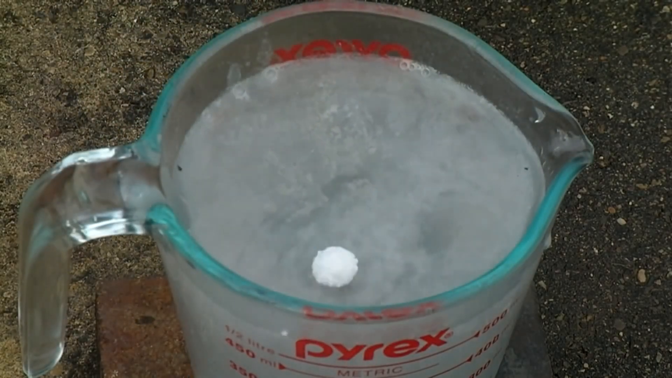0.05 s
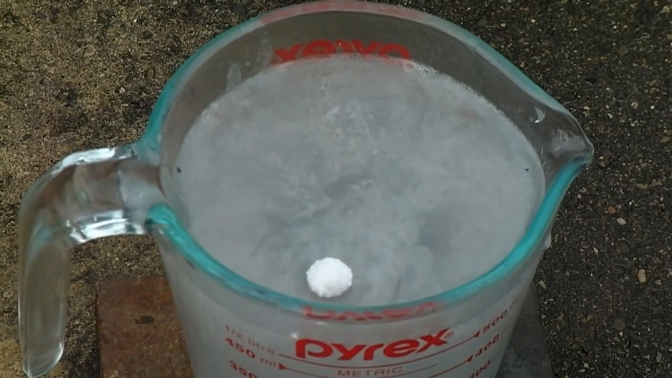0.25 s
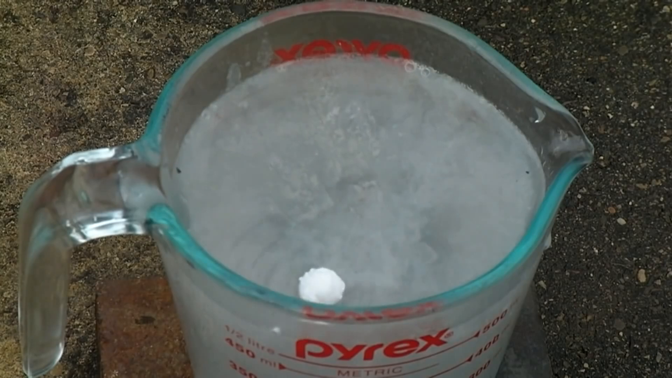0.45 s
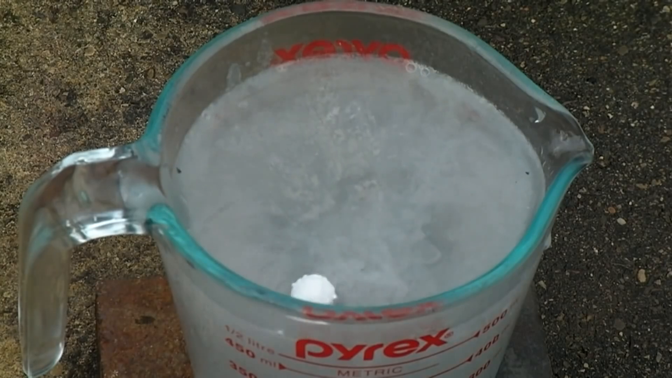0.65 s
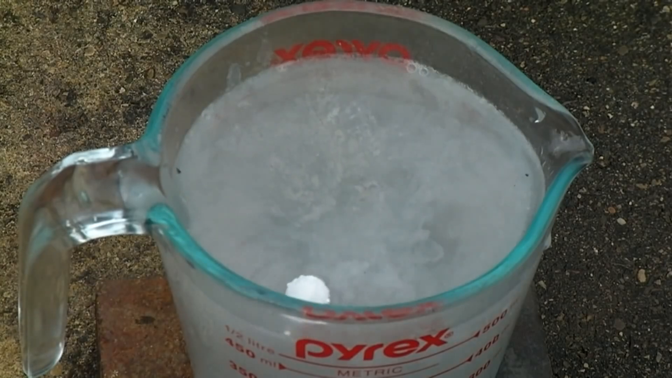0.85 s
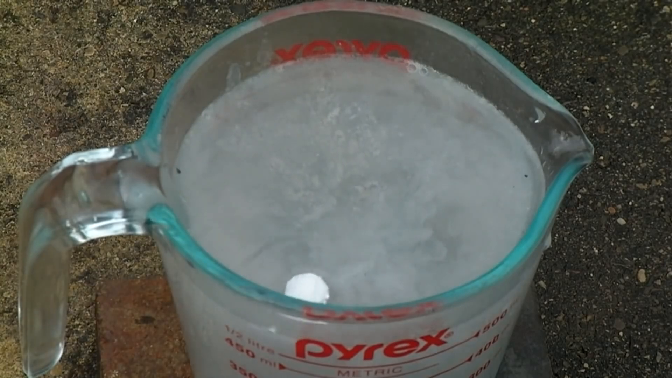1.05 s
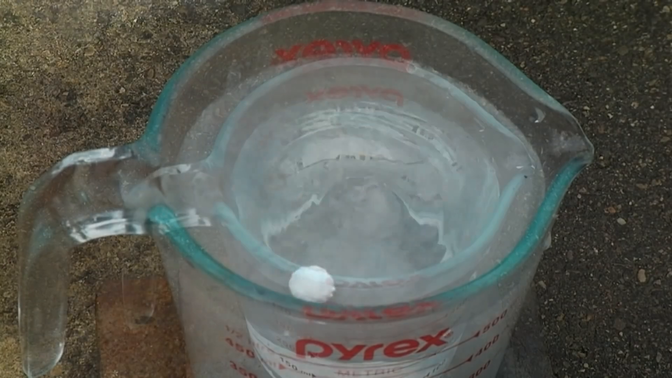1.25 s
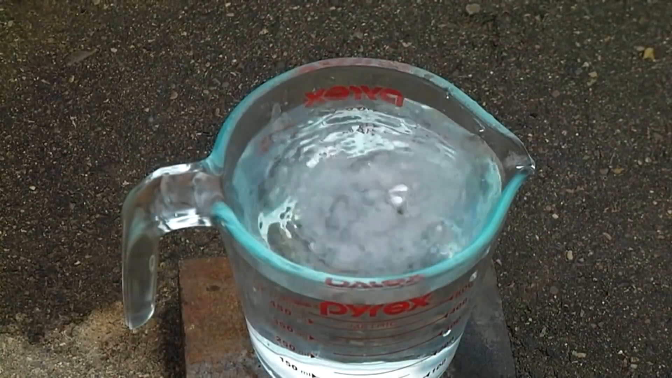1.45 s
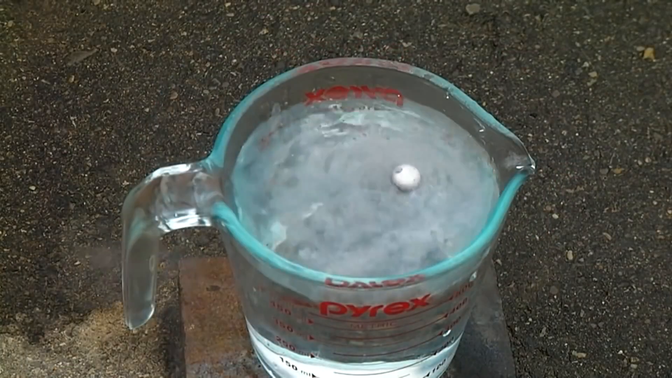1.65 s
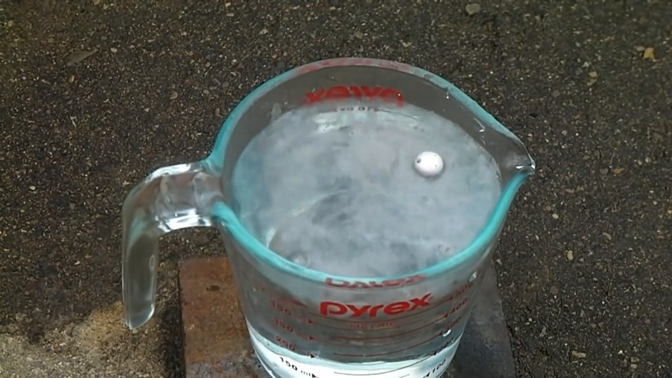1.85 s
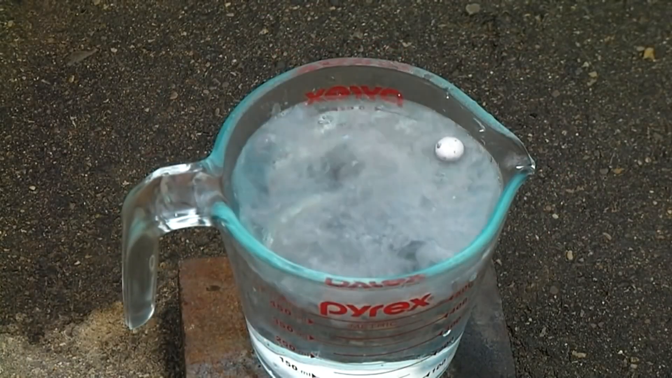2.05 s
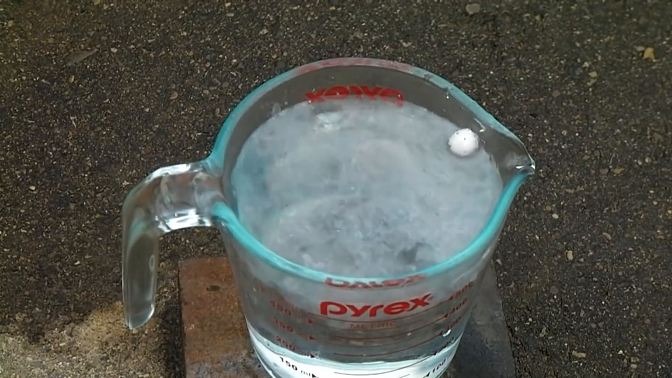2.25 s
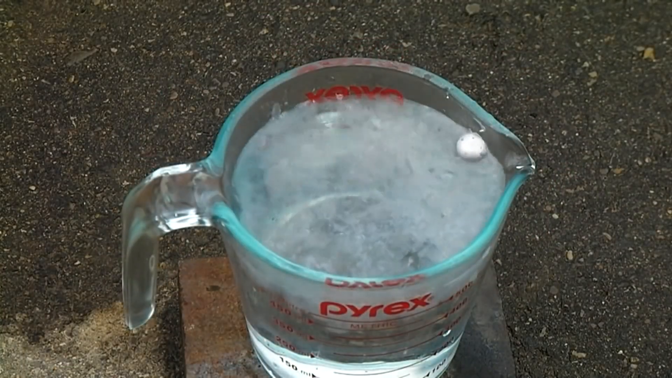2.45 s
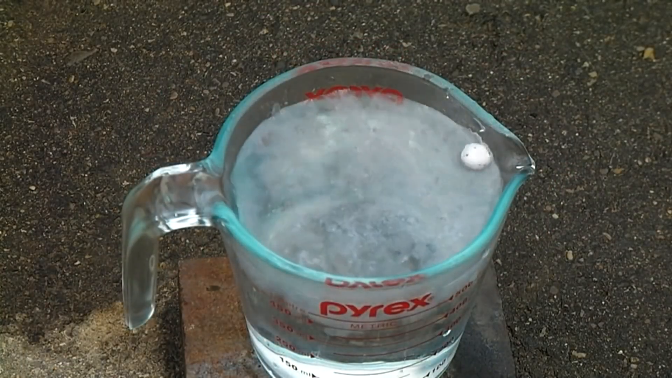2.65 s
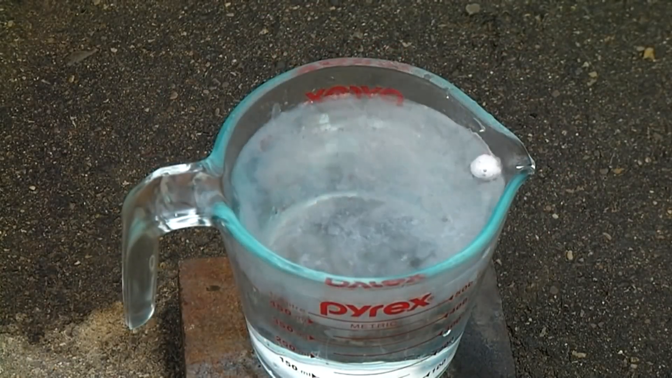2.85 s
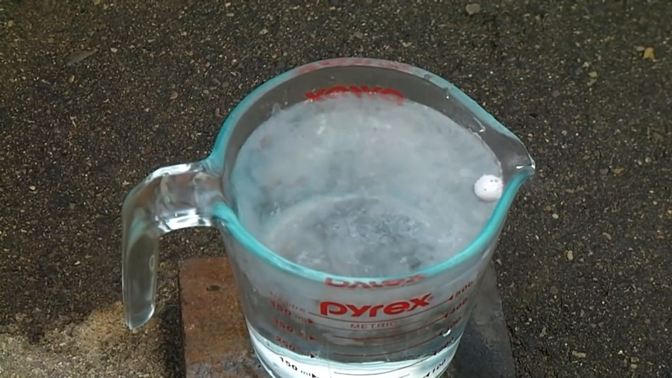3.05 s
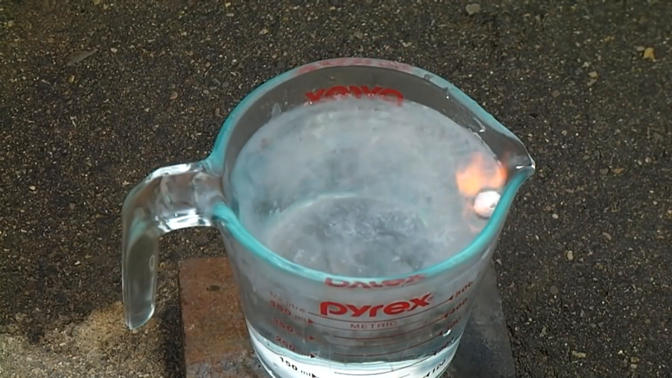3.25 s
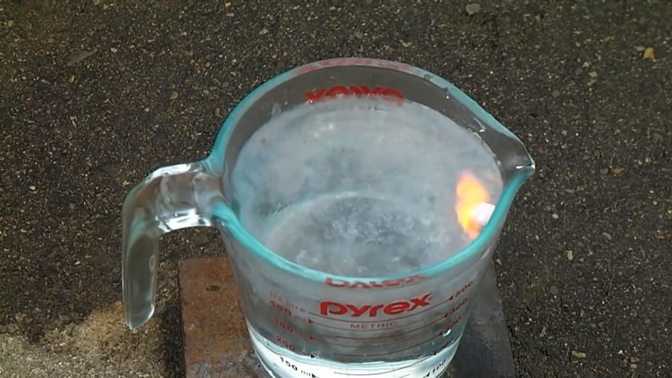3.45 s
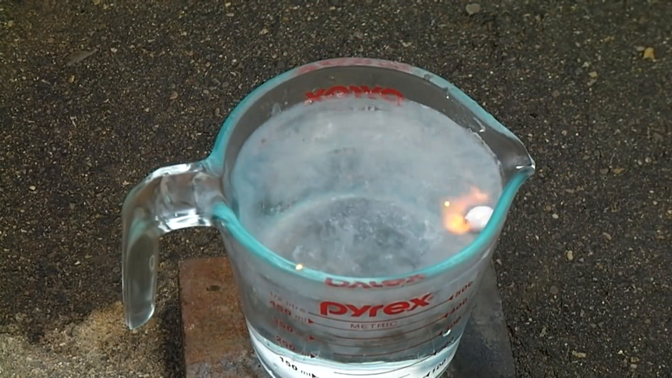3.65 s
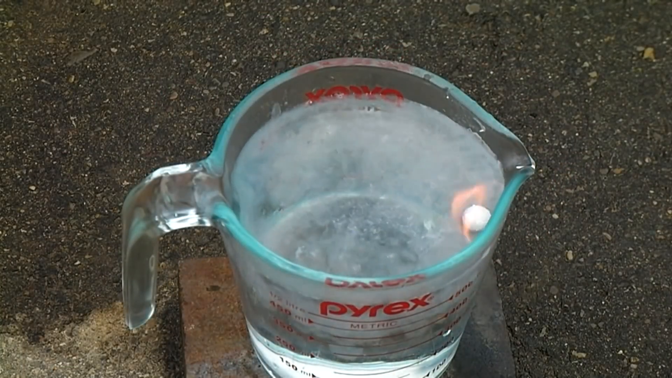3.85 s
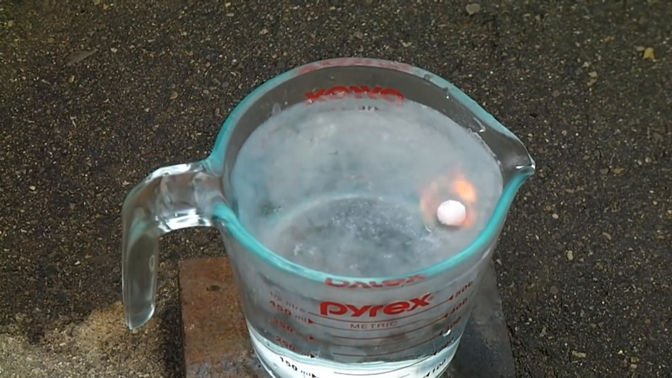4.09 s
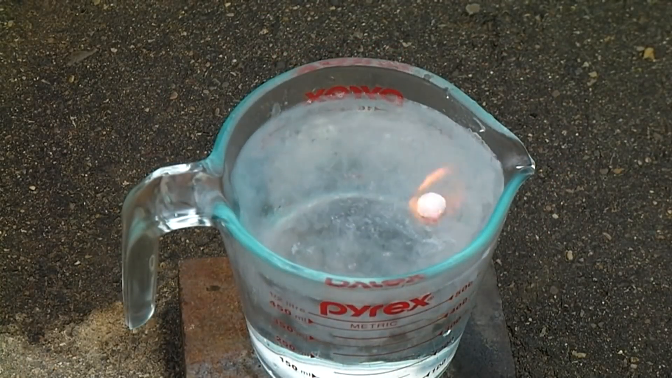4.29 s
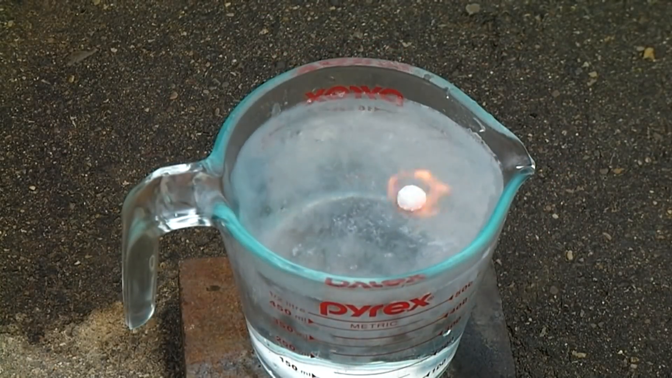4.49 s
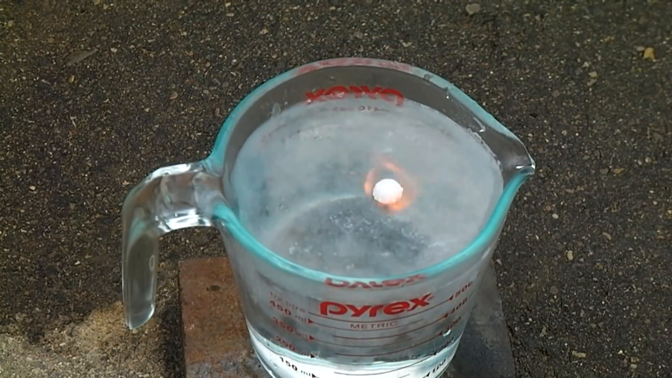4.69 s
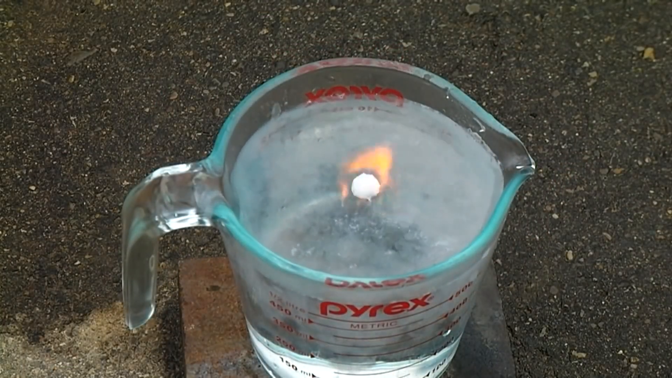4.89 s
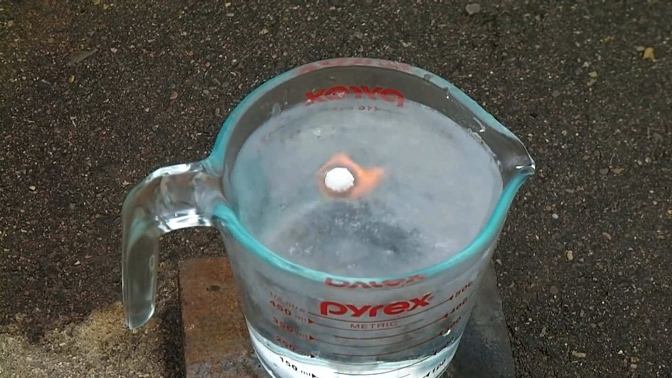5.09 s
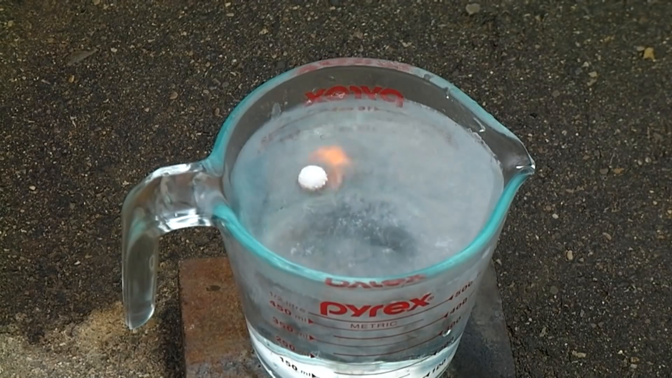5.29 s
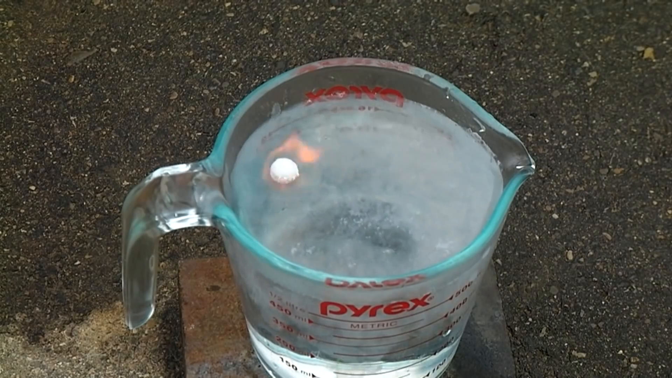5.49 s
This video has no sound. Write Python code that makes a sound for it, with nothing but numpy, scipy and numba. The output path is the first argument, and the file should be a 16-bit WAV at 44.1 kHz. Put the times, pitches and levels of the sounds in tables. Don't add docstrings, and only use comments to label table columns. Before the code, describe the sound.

A steady watery fizz over a faint hum cuts to a plop, lively sputtering hiss with bubbles, then one sharp pop and flickering fizz.

```python
import sys
import numpy as np
from scipy import signal
from scipy.fft import rfft, irfft
from scipy.io import wavfile
from scipy.ndimage import uniform_filter1d, map_coordinates
from numba import njit

SR = 44100
rng = np.random.default_rng(int(sys.argv[2]) if len(sys.argv) > 2 else 0)


def transcribe(u):
    v = np.clip(np.atleast_2d(u).T, -1, 1)
    q = np.round(v * 32767).astype(np.int16)
    wavfile.write(sys.argv[1], SR, q)


def amplitude_ratio(level_db):
    exponent = np.asarray(level_db, float) / 20
    return 10 ** exponent


N = 243873
TIME, FREQ = np.arange(N) / SR, np.arange(N // 2 + 1) * SR / N + 1

# pitch_hz, level_db per Hz
TRAFFIC = [(13, -56), (22, -9), (48, -9.5), (71, -2), (112, 0), (151, -3.5), (200, -15.5), (275, -19.5),
           (299, -11.5), (342, -5), (411, 0), (604, -9.5), (1200, -8), (1560, -19), (2640, -120)]
# middle_s, length_s, rise_db
VEHICLES = [(.4, 0.57, 5.5), (1.4, 0.77, 4.5), (2.73, 0.13, 2), (4.2, 0.18, 6), (5.3, 1, 4)]
# middle_s, length_s, rise_db
SLOPS = [(1.25, 0.16, 1), (1.7, 0.24, 6.5), (1.98, 0.11, 2.5), (2.3, 0.048, 6.5), (3.5, 0.14, 1.5),
         (3.85, 0.11, 3.5), (4.95, 0.12, 2)]
# time_s, level_db
HUM_LEVEL = [(0, -44), (.5, -48.5), (.9, -52), (1.25, -54.5), (1.4, -83.5)]
# pitch_hz, level_db
HUM_TONES = [(131.5, -47), (306.8, -75)]
# start_s, length_s, level_db
SCUFFS = [(.76, .05, -50), (1.37, .06, -52), (1.48, .04, -44), (1.922, .055, -34), (2.43, .06, -41),
          (2.845, .06, -42), (3.3, .06, -45), (3.82, .06, -47), (4.4, .06, -49)]
# pitch_hz, correlation
PORT_LIKENESS = [(25, .5), (60, .85), (130, .91), (290, 0.34), (640, 0.29), (1400, 0.81), (2300, 0.99),
                 (3900, 0.96), (5000, 0.63), (7000, 0.7), (8800, 0.81), (10000, 0.92), (11200, 0.82),
                 (12700, .93)]
# pitch_hz, left_minus_right_db
PORT_TILT = [(60, 2.5), (200, 1), (700, 0.5), (2400, -0.5), (4000, -0.5), (5000, -2.5), (6600, -6.5),
             (7600, -1), (8800, -2.5), (9800, -4.5), (10800, -2), (12500, -2), (15000, -1)]
# pitch_hz, width_hz, depth (0-1)
PORT_GAPS = [(7870, 415, 0.96), (7370, 480, 0.44), (9070, 300, 0.25)]
# start_s, length_s, peak_db, middle_hz
GURGLES = [(1.399, 0.038, -35, 910), (1.45, .03, -31, 1010), (1.755, .03, -36, 900),
           (1.93, 0.043, -36, 700), (2.439, 0.045, -36.5, 875), (2.852, 0.036, -37, 900),
           (3.797, 0.047, -39.5, 910), (4.284, 0.035, -46, 900)]
# start_s, peak_db, pitch_hz, length_cycles
SPITS = [(1.394, -29, 1000, 2), (1.422, -28, 1120, 3.9), (1.46, -37, 905, 3.8), (1.638, -25, 1170, 2.2),
         (1.76, -25, 1510, 3.3), (1.897, -30, 444, 2.3), (1.92, -32, 507, 2.8), (1.947, -30, 960, 2.9),
         (2.434, -29, 1340, 3), (2.473, -23.5, 1520, 5.1), (2.582, -35, 1260, 3), (2.666, -34, 430, 2.4),
         (2.795, -34, 2220, 3.7), (2.838, -35, 1710, 4.4), (2.865, -38, 414, 4.2), (2.86, -34, 1250, 6),
         (3.34, -23, 2500, 3.8), (3.3575, -24, 1050, 1.2), (3.358, -30, 396, 1.9), (3.3617, -21, 1250, 1.6),
         (3.369, -26, 1400, 3), (3.492, -32, 1380, 4.6), (3.719, -25, 1700, 1.9), (3.8085, -27, 1120, 2.1),
         (3.8213, -24.5, 1460, 2.2), (3.8247, -30, 910, 2.7), (4.297, -30.5, 1200, 2.6),
         (4.99, -29.5, 824, 2)]
# start_s, peak_db, pitch_hz, length_cycles, glide_per_cycle
LANDING = [
    (1.4678, -21.5, 1590, 22, 0.12),
    (1.472, -24, 2170, 14, 0.039),
    (1.477, -22, 2800, 9, .061),
    (1.482, -33, 3450, 33, .02),
]
# start_s, peak_db, pitch_hz, length_cycles, left_minus_right_db
TICKS = [(1.103, -16, 10900, 3, -9), (1.3562, -14, 9200, 6, -1), (1.4262, -22, 2210, 17, -2),
         (1.4295, -22.5, 2420, 10, 5), (1.4335, -22, 2100, 3.8, -1), (1.932, -27, 5000, 2, 5),
         (1.9463, -20, 5200, 3, 16), (1.9464, -23, 2680, 5.1, 13), (3.2868, -19, 4100, 6, -6),
         (3.295, -19, 4000, 9, -12)]
# pitch_hz, level_db, t60_s
POP_RING = [(760, -19, .03), (980, -21, .025), (1300, -9, .011), (1520, -10, .011), (2100, -17, .013),
            (2730, -9, .013), (3780, -1, .011), (4500, -6, .009), (5300, -8, .006)]
# pitch_hz, level_db, t60_s
POP_PUFF = [(110, -17, .07), (200, -25, .04), (370, -28, .035)]
# delay_s, level_db
POP_ECHO = [
    (0, 0),
    (.005, -11),
    (.0095, -24),
]
# time_s, gap_hz, gap_depth (0-1), peak_db
JUG_AIR = [(1.4, 4300, 0, 4), (2.2, 4100, .1, -3), (2.9, 3450, .4, 5), (3.1, 3350, .8, 6),
           (4.2, 3180, .5, 6.5), (4.7, 3300, .2, 2), (4.75, 4150, 0, 2), (4.95, 4230, 1, 4),
           (5.35, 4310, 1, 4), (5.43, 4400, 0, 2)]
# time_s, gap_hz, gap_depth (0-1)
UPPER_GAP = [(3.25, 5470, 0.3), (3.4, 5330, 1), (3.55, 5220, .7), (4.2, 5100, 0.6), (4.5, 5700, 0.5),
             (4.7, 6030, 0)]
FAR_WALL_MS = (1.45, .77)
FAR_WALL_DB = (-19.5, -21.5)
# pitch_hz, level_db per Hz
RESTING = [(350, -25), (600, 0.5), (717, -24), (805, -10.5), (1750, -2), (2190, -14.5), (2670, -2.5),
           (3090, -0.5), (3780, -4.5), (4110, 0), (4520, -4), (6120, 1.5), (7400, -3.5), (9620, -22),
           (16300, -120)]
RESTING_TOP = [(4880, -34), (8300, -2), (9370, -1), (10100, -8), (10600, -0.5), (11900, 0.5), (12400, 0),
               (14800, 2.5), (15400, -3)]
# pitch_hz, level_db per Hz
SKATING = [(350, -55), (600, -15.5), (1480, -0.5), (1830, -2), (2280, -1), (3470, -4.5), (3900, -2.5),
           (4560, -2.5), (5180, 0.5), (6590, -2.5), (7400, -7.5), (9620, -27), (16300, -120)]
SKATING_TOP = [(4880, -34), (8300, -2), (8880, -0.5), (9840, -6), (11300, -1), (12400, -3.5), (14100, -1),
               (15400, -4)]
# time_s, gas_flow_db, water_churn_db
REACTION = [(0, 0.5, .5), (1.4, -0.7, 13), (1.49, 3, 9), (1.56, 3.5, 6), (1.74, 6.5, 6), (1.86, 1, 1),
            (2.0, -1, 4), (2.15, -2, 5.5), (2.27, 3.5, 8), (2.42, 5, 6.5), (2.97, 5, 4), (3.3, 3, 4),
            (3.33, -6, 3.5), (3.5, -4, 2.5), (3.78, 1.5, 2), (4.1, -3, .5), (5.0, 0, 0.5), (5.53, 0, 1)]
# middle_s, length_s, flow_lost_db
LULLS = [(1.66, 0.03, -3), (2.61, 0.11, -1.5), (2.85, 0.14, -1.5), (3.11, 0.055, -1.5), (3.62, 0.034, -1),
         (3.905, 0.06, -4.5), (4.05, 0.04, -5.5), (4.18, .05, -1.5), (4.335, 0.022, -4.5),
         (4.425, 0.038, -4.5), (4.555, 0.038, -4.5), (4.675, 0.031, -5), (4.84, 0.047, -4),
         (4.99, 0.032, -3), (5.26, 0.11, -3.5), (5.53, 0.048, -2)]
# time_s, left_minus_right_db
BALL_PAN = [(0, -1), (1.4, 0.5), (2.3, -4.5), (3.2, -3.5), (4.4, -4), (5.53, -0.5)]
WAKES_S = (1.497, 1.485, 1.478, 1.467)

SCENE_CHANGE_S = 1.4
POP_S, POP_DB = 3.29874, -6.3
SWAP_S = 0.003


def curve(table):
    s, *columns = np.transpose(table)
    return [np.interp(TIME, s, c) for c in columns]


def shape(table):
    hz, db = np.transpose(table)
    return np.interp(np.log(FREQ), np.log(np.maximum(hz, 1)), db)


def swells(table):
    return sum(db * np.exp(-((TIME - s) / long) ** 2) for s, long, db in table)


def switch(s, long):
    return 0.5 + 0.5 * np.tanh((TIME - s) / long)


def colour(x, gain, lo_hz, hi_hz):
    edge = 1 / np.sqrt((1 + (lo_hz / FREQ) ** 12) * (1 + (FREQ / hi_hz) ** 12))
    y = irfft(rfft(x) * gain * edge, N)
    return y / y.std()


def walk(rate):
    hold = max(int(SR / rate), 1)
    levels = rng.standard_normal(N)[np.arange(N) // hold]
    smooth = uniform_filter1d(uniform_filter1d(levels, hold), hold)
    return smooth / smooth.std()


def flutter(lo_hz, hi_hz):
    return colour(rng.standard_normal(N), 1, lo_hz, hi_hz)


@njit
def moving_band(x, hz, width):
    y, band, low = np.empty(len(x)), 0., 0.
    for i in range(len(x)):
        g, k = np.tan(np.pi * hz[i] / SR), width / hz[i]
        v = (band + g * (x[i] - low)) / (1 + g * (g + k))
        band, low, y[i] = 2 * v - band, low + 2 * g * v, k * v
    return y


def stereo(mid, side):
    like, tilt = np.clip(shape(PORT_LIKENESS), 0, 1), shape(PORT_TILT) / 2
    shared = rfft(mid) * np.sqrt(1 + like)
    unshared = rfft(side) * np.sqrt(1 - like)
    return irfft(np.array([(shared + unshared) * amplitude_ratio(tilt), (shared - unshared) * amplitude_ratio(-tilt)]), N)


def traffic():
    pair = stereo(*rng.standard_normal((2, N)))
    road = amplitude_ratio(shape(TRAFFIC))
    bass_db = -54 + swells(VEHICLES) + 0.27 * walk(10)
    middle_db = -57 + swells(SLOPS) + 1.3 * walk(12)
    return amplitude_ratio(bass_db) * colour(pair, road, 15, 243) + amplitude_ratio(middle_db) * colour(pair, road, 235, 1370)


def motor_hum():
    turning_s = np.cumsum(1 + 0.011 * walk(12)) / SR
    hum = 0
    for hz, db in HUM_TONES:
        level = amplitude_ratio(db - HUM_TONES[0][1] + walk(4.5))
        hum = hum + level * np.sqrt(2) * np.sin(2 * np.pi * hz * turning_s)
    return hum * amplitude_ratio(curve(HUM_LEVEL)[0] + np.array([[0.9], [-0.9]]))


def scuffs():
    grains = amplitude_ratio(4 * rng.exponential(size=N)) * rng.standard_normal(N)
    grit = colour(grains, 1 / (1 + FREQ / 9000), 900, 8000)
    rub = sum(amplitude_ratio(db) * np.exp(-((TIME - s - long / 2) / (0.56 * long)) ** 2) for s, long, db in SCUFFS)
    return rub * grit * np.array([[1], [0.15]])


def bubbles(table):
    out = np.zeros((2, N))
    for s, db, hz, cycles, glide, pan_db in table:
        t = np.arange(int(2.5 * cycles / hz * SR)) / SR
        turns = hz * t * (1 + glide * hz * t / 2)
        decay = np.exp(-2.2 * turns / cycles) * (1 - np.exp(-turns / 0.24))
        ring = np.sin(2 * np.pi * turns) * decay
        start = int(s * SR)
        out[:, start:start + len(t)] += ring * amplitude_ratio(db + np.array([[pan_db], [-pan_db]]) / 2)
    return out


def gurgles(count=9):
    rows = []
    for s, long, db, hz in GURGLES:
        for when, soft, size, place in rng.random((count, 4)):
            pitch_hz = hz * 2 ** (1.38 * (size - 0.5))
            rows.append((s + long * when, db - 8 * soft, pitch_hz, 3.5, 0.04, 3 * place - 1))
    return bubbles(rows)


def splashes():
    spits = [(s, db, hz, n, 0.01, np.log2(1500 / hz)) for s, db, hz, n in SPITS]
    landing = [(*row, -3.5) for row in LANDING]
    ticks = [(s, db, hz, n, 0.003, pan_db) for s, db, hz, n, pan_db in TICKS]
    return bubbles(spits + landing + ticks)


def pop():
    t = np.arange(SR // 5) / SR
    snap = -sum(amplitude_ratio(db) * np.cos(2 * np.pi * hz * t) * 1000. ** (-t / t60) for hz, db, t60 in POP_RING)
    puff = sum(amplitude_ratio(db) * np.sin(2 * np.pi * hz * t) * 1000. ** (-t / t60) for hz, db, t60 in POP_PUFF)
    burst = amplitude_ratio(-10) * t / 0.002 * np.exp(-t / 0.002)
    rasp = burst * moving_band(rng.standard_normal(len(t)), 2400 + 0 * t, 3500.)
    ring = np.convolve(snap + puff + rasp, np.hanning(13))[:len(t)]
    out = np.zeros(N)
    for delay, db in POP_ECHO:
        start = int((POP_S + delay) * SR)
        out[start:start + len(t)] += amplitude_ratio(db) * ring
    return amplitude_ratio(POP_DB) * out / np.abs(out).max() * amplitude_ratio(np.array([[-0.3], [0.3]]))


def jug(x):
    gap_hz, gap, peak_db = curve(JUG_AIR)
    upper_hz, upper = curve(UPPER_GAP)
    skating = TIME > SCENE_CHANGE_S
    depth = np.clip(gap + 0.4 * (1 - gap) * walk(9), 0, 1)
    x = x - skating * depth * moving_band(x, gap_hz, 480.)
    x = x - skating * np.clip(upper, 0, 1) * moving_band(x, upper_hz, 950.)
    x = x + skating * (amplitude_ratio(peak_db) - 1) * moving_band(x, gap_hz + 660, 640.)
    near_ms = 0.384 + 0.028 * walk(3)
    far_ms, far_db = (np.where(skating, b, a) for a, b in (FAR_WALL_MS, FAR_WALL_DB))
    near, far = (map_coordinates(x, [np.arange(N) - ms * SR / 1000], order=3) for ms in (near_ms, far_ms))
    return x + amplitude_ratio(-18) * near + amplitude_ratio(far_db) * far


def gas_cracks():
    flow = amplitude_ratio(0.96 * flutter(58, 103) + 1.6 * walk(600))
    cracks = amplitude_ratio(1.2 * np.minimum(rng.exponential(size=N), 6.5))
    return stereo(*(jug(flow * cracks * rng.standard_normal(N)) for _ in range(2)))


def fizz():
    pair = gas_cracks()
    flow_db, churn_db = curve(REACTION)
    flow_db = flow_db + swells(LULLS)
    lit = switch(POP_S, SWAP_S) * np.exp(-((TIME - POP_S) / 0.98) ** 2)
    wait_db, wait, hush = -5.5, switch(1.366, SWAP_S), switch(1.446, 0.012)
    treble, full = (RESTING_TOP[1:-1], SKATING_TOP[1:-1]), (RESTING, SKATING)
    body = (RESTING[:-1], SKATING[:-1])
    # level_db, share of flow, share of churn, hush_db, lit_db, low_hz, high_hz, colours
    layers = ((-37.5, 1.5, 0, -29, -0.5, 11000, 18000, treble),
              (-37.5, 1.13, -0.16, -19, -1, 7850, 11000, treble),
              (-42.5, 0.3, 1.0, -10, 0, 3300, 7850, body),
              (-46, 0.24, 0.13, -2, -2, 650, 3300, full))
    out = 0
    for wake_s, (db, by_flow, by_churn, hush_db, lit_db, lo_hz, hi_hz, colours) in zip(WAKES_S, layers):
        awake = switch(wake_s, 0.008)
        pause_db = (wait_db * wait + (hush_db - wait_db) * hush) * (1 - awake)
        level_db = db + by_flow * flow_db + by_churn * churn_db * awake + pause_db + lit_db * lit
        resting, skating = (colour(pair, amplitude_ratio(shape(c)), lo_hz, hi_hz) for c in colours)
        band = np.where(TIME < SCENE_CHANGE_S, resting, skating)
        out = out + amplitude_ratio(level_db + 0.29 * flutter(13, 116)) * band
    pan_db = curve(BALL_PAN)[0]
    return out * amplitude_ratio(0.33 * np.array([[1], [-1]]) * (pan_db - pan_db.mean()) / 2)


def scene():
    return traffic() + motor_hum() + scuffs() + gurgles() + splashes() + pop() + fizz()


def band_limit(x):
    return signal.sosfilt(signal.butter(12, 16150, fs=SR, output="sos"), x)


def record(dry):
    housing = 1
    for hz, width, depth in PORT_GAPS:
        housing = housing * (1 - np.clip(depth, 0, 1) / (1 + (2 * (FREQ - hz) / width) ** 2))
    edges = 1 / (1 + (38 / FREQ) ** 2) / (1 + (FREQ / 15715) ** 600)
    return band_limit(irfft(rfft(dry) * housing * edges, N))


dry = scene()
out = record(dry)
transcribe(out)
```